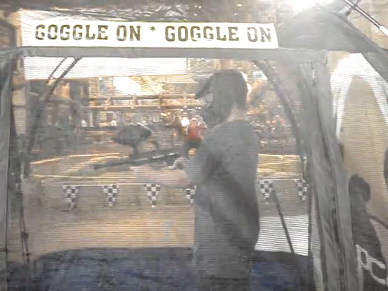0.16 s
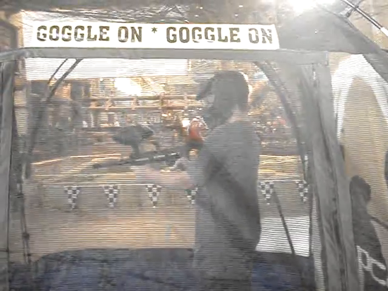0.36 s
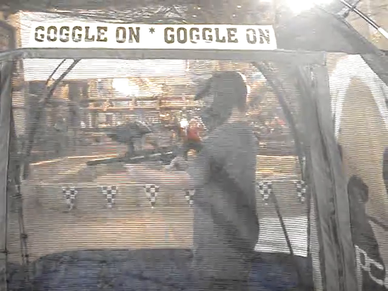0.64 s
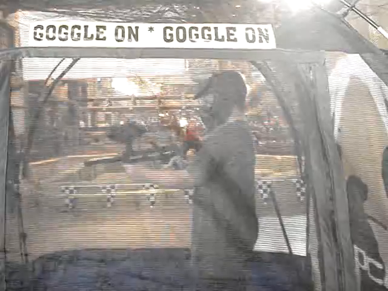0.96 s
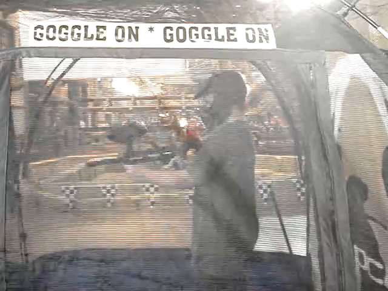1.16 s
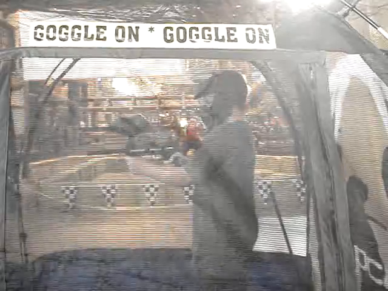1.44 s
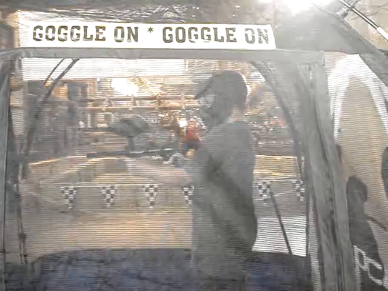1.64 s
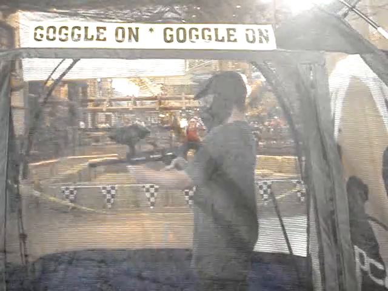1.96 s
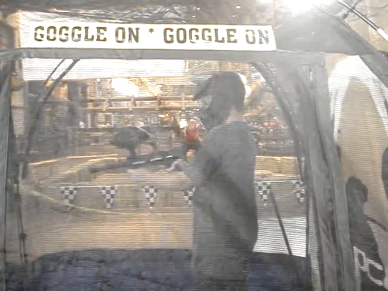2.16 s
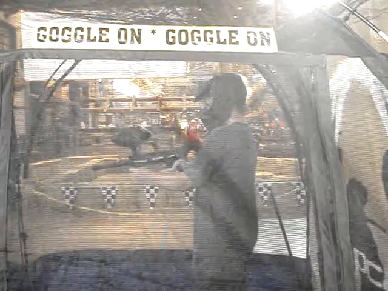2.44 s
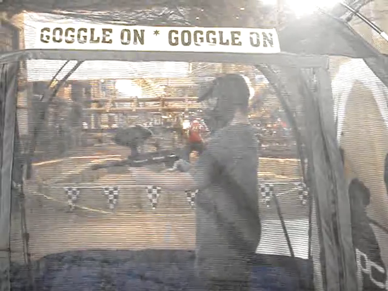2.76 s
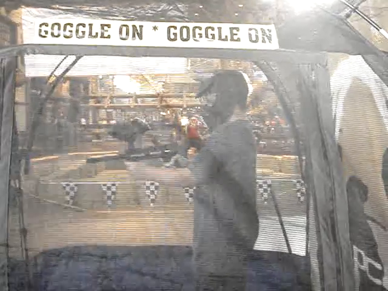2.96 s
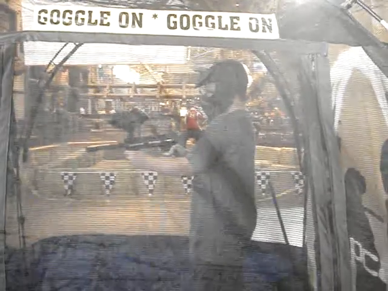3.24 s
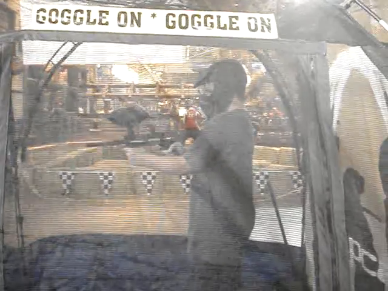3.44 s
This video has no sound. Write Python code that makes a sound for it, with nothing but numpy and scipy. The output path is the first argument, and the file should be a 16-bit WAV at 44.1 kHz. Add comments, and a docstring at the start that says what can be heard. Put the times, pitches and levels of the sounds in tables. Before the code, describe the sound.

Steady single paintball shots, snappy pops with gas hiss and roaring reverb in a big indoor space.

```python
"""Paintball shots in a hard hall

A gas paintball marker fires at a steady pace from a tent that opens on a large, hard hall with steady noise.
Hammer ticks, slaps, barrel ring, far-wall echo and balls bursting down range are band-passed dips with dying
noise; the muzzle pop is a filtered impulse. Third-octave noise bands make the venting gas, the late roar and
the steady noise. A fast gain control squeezes it all, and a standing offset thumps as the gain moves.
"""
import sys
import numpy as np
from scipy import signal
from scipy.io import wavfile

SR = 44100
rng = np.random.default_rng(int(sys.argv[2]) if len(sys.argv) > 2 else 0)


def wav_record(signal):
    """Record a signal, one row per channel, as 16-bit PCM in the file named by sys.argv[1]."""
    frames = np.transpose(np.atleast_2d(signal))
    bounded = np.clip(frames, -1, 1)
    # unit amplitude maps onto the largest positive 16-bit level
    quanta = np.round(bounded * 32767).astype(np.int16)
    wavfile.write(sys.argv[1], SR, quanta)


N = 159201  # samples heard
LEAD_S = 1  # run-in, cut off at the end
SIZE = N + LEAD_S * SR

# All levels are set ahead of the gain control.
# Shots, the first one before the start: start_s, level_db, roar tilt above 1 kHz and below 1 kHz
# (both db_per_octave), hammer_lead_s, hammer_db, roar_db, fullest roar pitch_hz, gas_db
SHOTS = [(-.66, -.1, .1, .1, .018, -20, .1, 900, .1), (.0556, -.3, 1.2, -.8, .0181, -16, -1.2, 850, .1),
         (.9045, .1, -.6, .3, .0178, -17, .1, 900, .6), (1.612, -.3, -1.2, 1.2, .0182, -18, .8, 1200, -.8),
         (2.3349, -1.1, -.3, -.8, .0183, -16, .1, 800, 1.2),
         (3.0348, .4, .8, -.3, .0182, -16, .8, 1100, .1)]
# What follows each pop: slaps, a narrow barrel ring near 770 Hz, then at about 65 ms a strong low-mid echo
# from the far wall: delay_s, level_db, centre_hz, band spread each way (ratio, at least 1.1 in use), t60_s
AFTER_POP = [(.0024, 5, 2530, 2.3, .015), (.003, -3.5, 773, 1.1, 0.017), (.0068, -7, 391, 1.51, 0.012),
             (.0283, -3.5, 2100, 1.93, 0.021), (.0395, -8, 2200, 1.7, .005), (.0525, -12, 3200, 1.8, 0.042),
             (.0643, 1.2, 810, 1.85, 0.013), (.0655, -15.5, 331.7, 0.5, 0.02)]
# Balls bursting down range: start_s, level_db, centre_hz
BURSTS = [(0.1422, -12, 2460), (0.98, -7.5, 1354), (1.685, -4, 1010), (2.4109, -11.5, 1002),
          (3.1108, 2.5, 1480)]
# Colour of the venting gas and its scatter in the tent: pitch_hz, relative density_db_per_hz
GAS_COLOUR = [(100, -24.5), (400, -9), (800, -14), (1600, -3), (2500, -5), (5500, -5), (8000, -12),
              (10300, -15.5)]
# Colour of the hall's answer: pitch_hz, relative density_db_per_hz
HALL_COLOUR = [(60, -46.5), (180, -25.5), (260, -10.5), (520, -4), (950, -0.1), (1800, -3.5), (3800, -12),
               (7600, -27), (10300, -37)]
# Ring time of the hall's answer: pitch_hz, t60_s
HALL_T60 = [(100, 1.34), (400, 1.15), (1000, 1.27), (3000, 1.11), (6000, 1.344), (10000, 0.34)]
# Colour of the hall's steady noise: pitch_hz, relative density_db_per_hz
FLOOR_COLOUR = [(20, -29), (60, -36), (100, -29.5), (140, -19), (230, -15), (600, -0.9), (1300, -4),
                (3200, -15), (6000, -35.5), (10300, -42)]

FLOOR_DB, PATCHY_DB, PATCHY_HZ = -31, 1.36, 24  # patchy: level wander of every noise band
HALL_DB, HALL_DELAY_S, HALL_RISE_S = -16.5, 0.062, 0.019
LATE_DB, LATE_LONGER = -7.5, 3.11  # the far end rings on, fainter and this many times longer
BARK_DB, BARK_OCTAVES, BARK_S = 3, 0.43, 0.1  # the young roar is fuller around one pitch
HAMMER_HZ, HAMMER_WIDE, HAMMER_T60_S = 6200, 1.26, 0.015  # WIDE: band spread each way, a ratio
POP_DB, POP_LOW_HZ, POP_CUT_HZ = 7.5, 207, 4300
GAS_DB, GAS_ATTACK_S, GAS_HOLD_S, GAS_T60_S = -23.5, 0.00033, 0.023, 1
GAS_RUSH_DB, GAS_RUSH_S = 22, 0.014  # louder in the first instant
SCATTER = 0.32  # noise against the leading dip of a puff
AFTER_SPREAD_DB, AFTER_SAME = 2, 0.45  # shot-to-shot level spread; share of noise power common to all shots
BURST_WIDE, BURST_T60_S = 2.37, 0.024
THRESHOLD_DB, SQUEEZE, ATTACK_S, RELEASE_DB_PER_S = -9, 1, 0.0001, 550  # SQUEEZE: dB down per dB over
OFFSET, COUPLING_HZ = 0.034, 7.9  # the microphone's standing offset, full scale = 1
TOP, CUTOFF_HZ = 0.72, 10600  # ceiling of the rounded peaks; treble cut


def amp(db):
    """Turns dB into a gain; twice the dB gives a power."""
    return 10 ** (np.asarray(db) / 20)


def at_hz(points, hz):
    """Reads a table on a log-frequency axis."""
    pitches, values = np.array(points).T
    return np.interp(np.log(hz), np.log(pitches), values)


def band_powers(colour, db, centres, widths):
    """Shares out a total level over noise bands in the given colour."""
    power = amp(at_hz(colour, centres)) ** 2 * widths
    return amp(db) ** 2 * power / np.sum(power)


def drift(rate_hz):
    """Slow random wander of spread 1: noise through two equal low-pass poles."""
    r = np.exp(-2 * np.pi * rate_hz / SR)
    slow = signal.lfilter([1], [1, -2 * r, r * r], rng.standard_normal(SIZE))
    return slow / slow.std()


def add(out, start_s, sound):
    """Mixes a sound in at a time."""
    i = int((start_s + LEAD_S) * SR)
    out[i:i + len(sound)] += sound[:len(out) - i]


def puff(noise, db, hz, wide, t60_s):
    """A dip in pressure, then dying scatter, in a band around hz; peak at db."""
    fade = amp(-60 * np.arange(len(noise)) / SR / t60_s)
    drive = SCATTER * noise * fade - signal.unit_impulse(len(noise))
    edges = [hz / wide, min(hz * wide, 0.45 * SR)]
    sound = signal.sosfilt(signal.butter(2, edges, "band", fs=SR, output="sos"), drive)
    return amp(db) * sound / np.abs(sound).max()


def air():
    """Third-octave noise bands carry steady noise, roar and gas, their powers added."""
    edges = 20 * 2 ** np.arange(0, 9.4, 1 / 3)
    centres, widths = np.sqrt(edges[1:] * edges[:-1]), np.diff(edges)
    floor = band_powers(FLOOR_COLOUR, FLOOR_DB, centres, widths)
    hall = band_powers(HALL_COLOUR, HALL_DB, centres, widths)
    gas = band_powers(GAS_COLOUR, GAS_DB, centres, widths)
    t = np.arange(SIZE) / SR - LEAD_S
    coarse_t = t[::16]  # envelopes are drawn at every 16th sample
    white = rng.standard_normal((2, SIZE))  # neighbouring bands take turns on two noises
    out = np.zeros(SIZE)
    for k, hz in enumerate(centres):
        power = floor[k]
        for start_s, db, treble, bass, _, _, roar_db, bark_hz, gas_db in SHOTS:
            since = np.maximum(coarse_t - start_s, 0)
            tilt_db = (treble if hz > 1000 else bass) * np.log2(hz / 1000)
            roar = amp(2 * tilt_db) * hall[k] * hall_roar(since, hz, roar_db, bark_hz)
            vent = amp(2 * gas_db) * gas[k] * gas_vent(since)
            power = power + amp(2 * db) * (vent + roar)
        band_filter = signal.butter(2, edges[k:k + 2], "band", fs=SR, output="sos")
        band = signal.sosfilt(band_filter, white[k % 2])
        level = np.interp(t, coarse_t, np.sqrt(power))
        out += band / band.std() * level * amp(PATCHY_DB * drift(PATCHY_HZ))
    return out


def hall_roar(since, hz, roar_db, bark_hz):
    """Power of the late answer: a delayed swell, a main decay with a bark, and a longer tail."""
    late = np.maximum(since - HALL_DELAY_S, 0)
    fall_db = 60 * late / at_hz(HALL_T60, hz)
    octaves = np.log2(hz / bark_hz)
    bark_db = BARK_DB * np.exp(-(octaves / BARK_OCTAVES) ** 2 - late / BARK_S)
    main = amp(2 * (roar_db + bark_db - fall_db))
    far_end = amp(2 * (LATE_DB - fall_db / LATE_LONGER))
    return (1 - np.exp(-late / HALL_RISE_S)) * (main + far_end)


def hammer_ticks(length):
    """The hammer strikes just before each pop: a short, narrow, high puff."""
    out = np.zeros(SIZE)
    for start_s, _, _, _, lead_s, tick_db, *_ in SHOTS:
        noise = rng.standard_normal(length)
        add(out, start_s - lead_s, puff(noise, tick_db, HAMMER_HZ, HAMMER_WIDE, HAMMER_T60_S))
    return out


def muzzle_pops(length):
    """The muzzle pops: one band-passed impulse per shot, pressure dipping first."""
    out = np.zeros(SIZE)
    band = signal.butter(2, [POP_LOW_HZ, POP_CUT_HZ], "band", fs=SR)
    pop = signal.lfilter(*band, signal.unit_impulse(length))
    for start_s, db, *_ in SHOTS:
        add(out, start_s, -amp(db + POP_DB) * pop / pop.max())
    return out


def gas_vent(since):
    """Power of escaping gas: quick onset, a first rush, a hold and a decay."""
    rush_db = GAS_RUSH_DB * np.exp(-since / GAS_RUSH_S)
    fall_db = 60 * np.maximum(since - GAS_HOLD_S, 0) / GAS_T60_S
    onset = 1 - np.exp(-since / GAS_ATTACK_S)
    return (onset * amp(rush_db - fall_db)) ** 2


def slaps_ring_and_echo(length):
    """Slaps, barrel ring and far-wall echo: delayed puffs, partly the same noise for every shot."""
    out = np.zeros(SIZE)
    shared = rng.standard_normal((len(AFTER_POP), length))
    for start_s, db, *_ in SHOTS:
        for k, (delay_s, after_db, hz, wide, t60_s) in enumerate(AFTER_POP):
            own = rng.standard_normal(length)
            noise = np.sqrt(AFTER_SAME) * shared[k] + np.sqrt(1 - AFTER_SAME) * own
            level_db = db + after_db + AFTER_SPREAD_DB * rng.standard_normal()
            add(out, start_s + delay_s, puff(noise, level_db, hz, max(wide, 1.1), t60_s))
    return out


def ball_bursts(length):
    """Balls burst down range: wide puffs, each at its own pitch."""
    out = np.zeros(SIZE)
    for start_s, db, hz in BURSTS:
        add(out, start_s, puff(rng.standard_normal(length), db, hz, BURST_WIDE, BURST_T60_S))
    return out


def scene():
    """The marker, its balls and the air around them, with the run-in cut off."""
    length = SR // 10
    marker = hammer_ticks(length) + muzzle_pops(length) + slaps_ring_and_echo(length)
    return (air() + marker + ball_bursts(length))[None, -N:]


def record(dry):
    """Fast gain control squeezes sound and offset; peaks round off and the top is cut."""
    # Peak level, held and let down at a constant rate in dB
    slope = RELEASE_DB_PER_S * np.arange(N) / SR
    level_db = 20 * np.log10(np.abs(dry[0]) + 1e-6)
    held_db = np.maximum.accumulate(level_db + slope) - slope
    gain_db = -SQUEEZE * np.maximum(held_db - THRESHOLD_DB, 0)
    r = np.exp(-1 / (ATTACK_S * SR))
    gain = amp(signal.lfilter([1 - r], [1, -r], gain_db))
    # Coupling removes the steady offset, but its jumps with the gain come through as thumps
    coupling = signal.butter(1, COUPLING_HZ, "high", fs=SR)
    thump = signal.lfilter(*coupling, OFFSET * (gain - 1))
    rounded = TOP * np.tanh(dry * gain / TOP)
    treble_cut = signal.cheby2(16, 60, CUTOFF_HZ, fs=SR, output="sos")
    return signal.sosfilt(treble_cut, rounded + thump)


dry = scene()
out = record(dry)
wav_record(out)
```